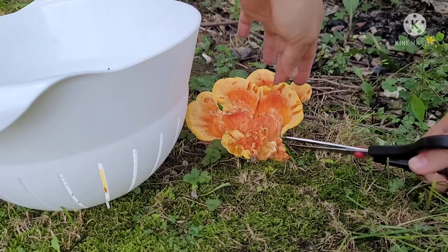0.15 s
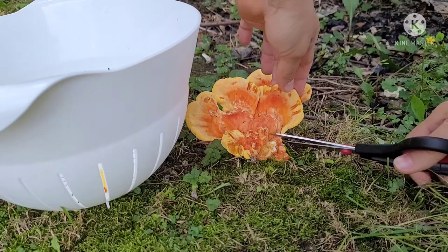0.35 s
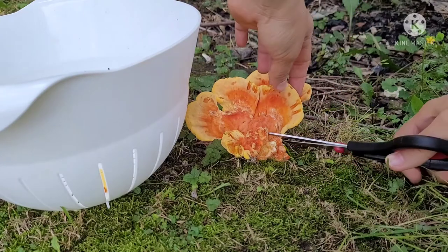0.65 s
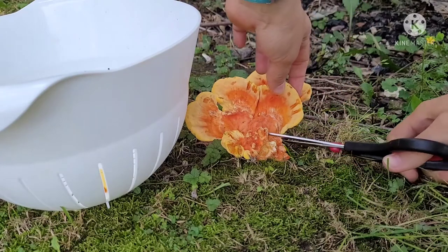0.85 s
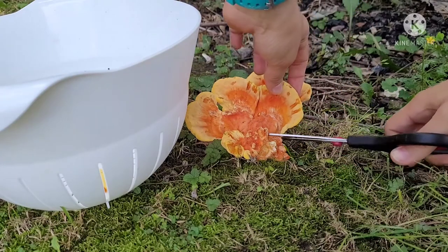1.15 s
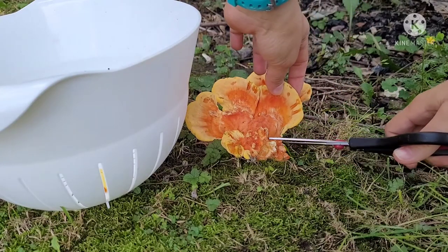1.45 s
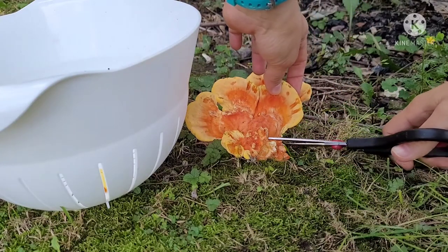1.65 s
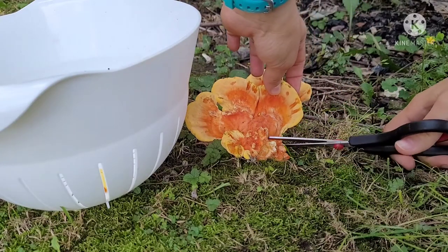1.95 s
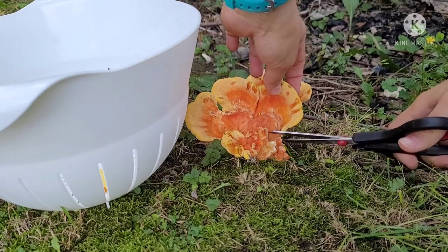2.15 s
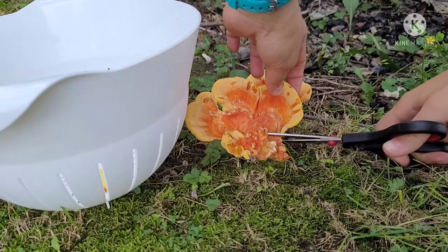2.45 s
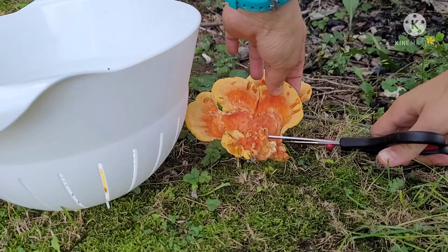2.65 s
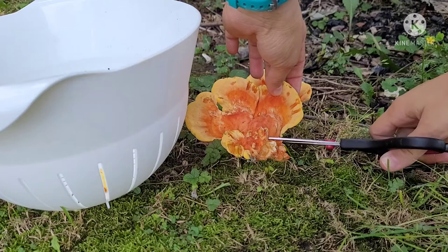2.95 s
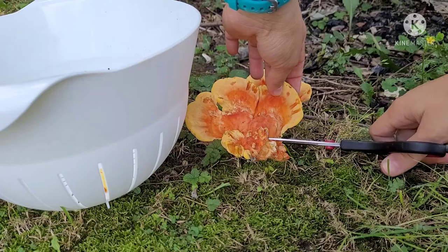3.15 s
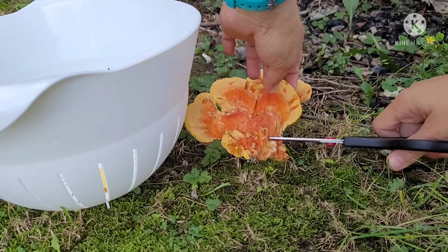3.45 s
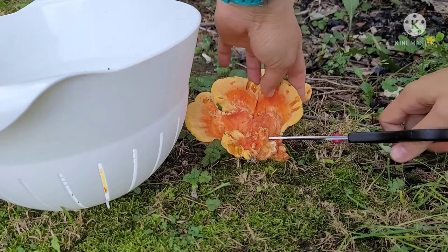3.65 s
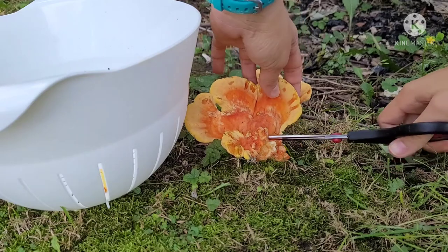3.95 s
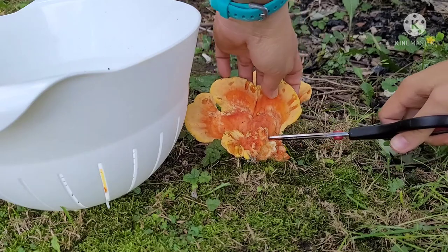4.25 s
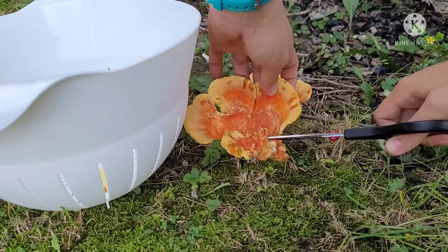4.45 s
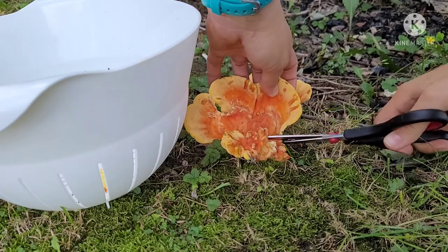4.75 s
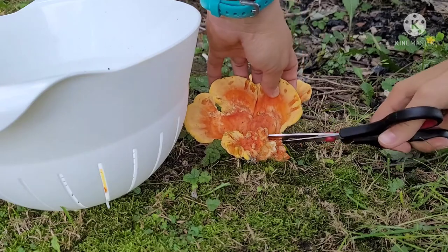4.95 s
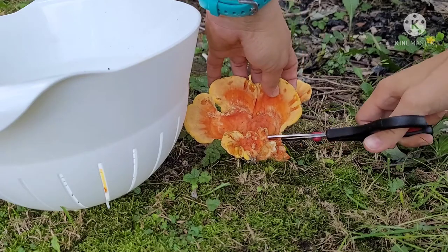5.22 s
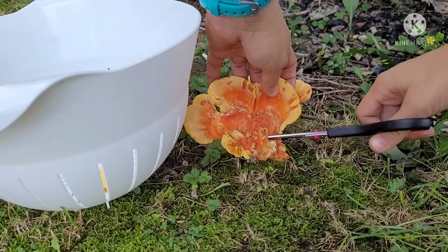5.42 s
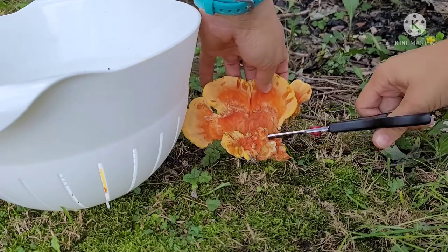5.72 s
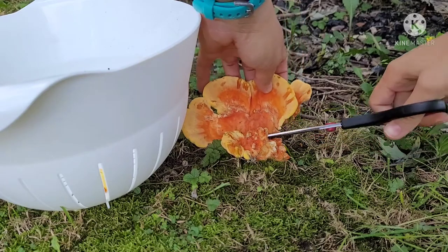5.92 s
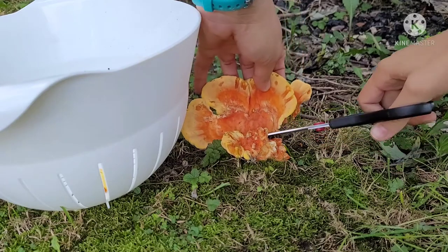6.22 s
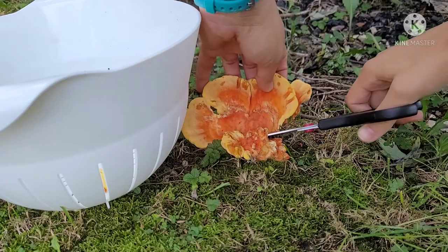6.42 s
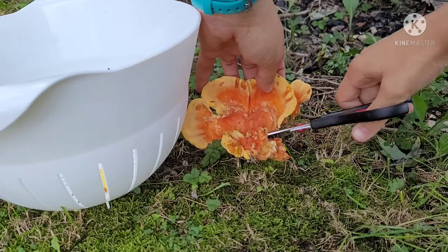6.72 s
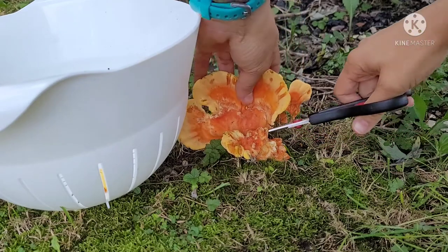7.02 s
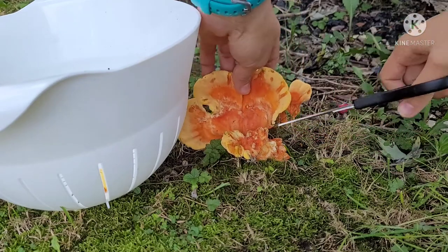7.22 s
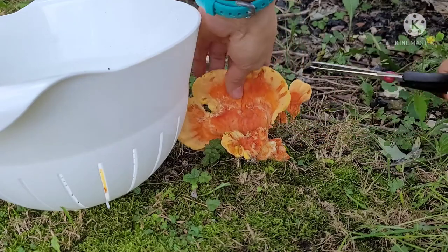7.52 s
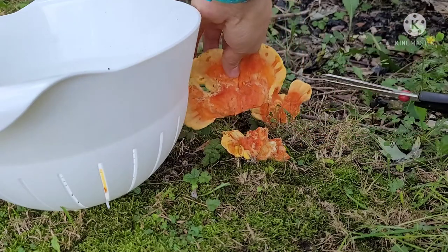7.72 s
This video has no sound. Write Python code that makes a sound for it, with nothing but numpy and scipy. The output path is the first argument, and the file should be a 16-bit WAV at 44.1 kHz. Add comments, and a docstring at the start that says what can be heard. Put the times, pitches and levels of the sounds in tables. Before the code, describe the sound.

Outdoors, a steady high cricket buzz and dull distant drone run throughout. Small dry ticks come first, then scissors nearby: crackling fibres and a hard snap, a gritty rub as the blades open, a long pause, a second snip, then a third. Soft rustling, faint falling bird whistles, a dull knock as the mushroom comes free and a final handle clack follow. The cutting is close and dry, with little echo.

```python
"""Crickets buzz from the start over a low outdoor rumble, with a faint brushing hand close by.
Scissors then cut a mushroom on a mossy woodland floor: three times flesh cracks, blades snap and rub open.
A far bird whistles, something rustles softly, twigs tick.
Contact sounds are noise bursts and slips driving resonances; animals are gliding sines; the air is coloured noise."""
import sys
import numpy as np
from scipy import signal
from scipy.fft import rfft, irfft
from scipy.io import wavfile

SR = 44100
rng = np.random.default_rng(int(sys.argv[2]) if len(sys.argv) > 2 else 0)


def to_wav(s):
    """Save 16-bit WAV."""
    ch = np.atleast_2d(s).T  # columns
    pcm = np.round(np.clip(ch, -1, 1) * 32767)  # PCM
    wavfile.write(sys.argv[1], SR, pcm.astype(np.int16))


N = 347135
TIME_S = np.arange(N) / SR
FREQS_HZ = np.maximum(np.arange(N // 2 + 1) * SR / N, 1)

# Levels in the tables are relative: gains, resonances and echoes follow. Colours are dB per Hz, scaled to rms 1.
# left-right likeness of noise: f/Hz, likeness (-1 to 1)
STEREO_LIKENESS = [(60, 0.9), (130, 0.96), (290, 0.83), (640, 0.026), (1400, -0.14), (3100, -0.1),
                   (15000, -0.045)]

# outdoor noise colours: f/Hz, density/dB
RUMBLE_COLOUR = [(11, -34.5), (18, -37), (43, -6), (59, 1), (86, -4.5), (114, -1), (200, -9.5), (260, -37),
                 (440, -120)]
DRONE_COLOUR = [(170, -17), (205, -5.5), (225, -1), (240, 5.5), (255, -2), (280, 2), (320, -6),
                (400, -11.5), (520, -21.5), (800, -56)]
AIR_COLOUR = [(300, -10), (600, 4), (800, 2.5), (1100, 2.5), (1350, -1.5), (1650, 2), (2050, -3.5),
              (2480, -11), (2800, -9), (3200, -19), (4400, -18.5), (5300, -43), (9000, -50)]
HISS_COLOUR = [(9000, -21.5), (10500, -33.5), (12500, -23), (14200, -2), (15100, 6), (15600, -5.5)]
# rises of the rumble: middle t/s, half length/s, rise/dB
RUMBLE_SWELLS = [(0.615, 0.012, 5.5), (1.463, 0.083, 5), (2.307, 0.079, 5), (2.56, 0.055, 8),
                 (3.9, 0.029, 7.5), (3.99, 0.093, 7), (4.224, 0.063, 5), (4.61, 0.053, 4.5),
                 (5.07, 0.38, 3), (6.164, 0.018, 8.5)]
RUMBLE_DB, RUMBLE_WANDER_DB = -50, -1
# far drone: t/s, level/dB
DRONE_LEVEL = [(0, -52), (2.4, -51), (3.25, -49.5), (3.7, -53.5), (4, -50.5), (5.85, -51.5), (7.05, -50),
               (7.4, -53), (7.87, -52)]
# narrow hum in the drone, swelling once
HUM_AT_S, HUM_HALF_S, HUM_HZ, HUM_WIDTH_HZ, HUM_DB = 3.204, 0.504, 278.6, 22, -49

# soft far rustle: t/s, length before the fade/s, level/dB
RUSTLES = [(5.106, 0.23, -61), (6.697, 0.35, -64)]
# rustle colour: f/Hz, density/dB
RUSTLE_COLOUR = [(300, -12), (550, 2.5), (900, 3), (1400, 1), (1900, 3), (2700, 0.5), (3300, -2),
                 (4300, -5.5), (4900, -14), (6000, -20), (9000, -43)]

# falling bird whistles: t/s, length/s, start f/Hz, end f/Hz, level/dB
WHISTLES = [(6.285, 0.43, 3650, 3270, -69), (6.858, 0.4, 3600, 3270, -72), (7.58, 0.38, 3700, 3160, -70.5)]

# far cricket chorus: f/Hz, density/dB
CHORUS_COLOUR = [(5600, -49), (6300, -20), (6800, -8), (7200, 0.5), (7750, 1.5), (8150, -3), (8700, -16),
                 (9700, -18), (10400, -43)]
# tree-cricket trill: t/s, level/dB
TRILL_LEVEL = [(0, -72.5), (1.2, -79.5), (2, -77.5), (3, -80), (4.2, -78), (5, -82), (6.3, -76),
               (7.87, -73.5)]
TRILL_HZ = 2790
# two-note chirps: first note t/s, level/dB
CRICKET_CHIRPS = [(.2, -70), (.83, -77), (1.41, -76), (2.1, -75), (5.3, -75), (6.49, -79), (7.56, -77)]
CHIRP_NOTE_HALF_S, CHIRP_NOTE_SPACING_S = 0.017, 0.056
# near cricket: t/s, level/dB
CRICKET_LEVEL = [(0, -56.5), (2.2, -53.5), (2.9, -55.5), (3.9, -53.5), (5.3, -57), (7.87, -55)]
# its strokes in a wing beat: place (0-1), half width/beats, f/Hz, fall/(Hz per beat), level/dB, L-R/dB
WING_STROKES = [(0.18, 0.18, 7875, 220, 3.5, 5.5), (.55, 0.19, 7440, 110, 1.5, 0.5),
                (0.06, 0.17, 8520, 350, -19.5, 1)]
BUZZ_WING_HZ = 47.2

# dry twigs ticking: t/s, level/dB, pitch ratio (limited to 0.7-1.3)
TWIG_TICKS = [(1.4794, -40, 1.15), (1.8771, -39, 1), (2.0482, -37, 1.4), (4.1345, -38, 1.1),
              (4.7925, -35, 0.87), (4.8194, -37, 1)]
# twig resonances: f/Hz, width/Hz, level/dB, L-R/dB
TWIG_MODES = [(3270, 570, -1, 5), (5350, 2300, 1, 0), (12000, 4000, -14, 2)]

# hand shifting on mushroom and moss: middle t/s, half length/s, level/dB
BRUSHES = [(0.098, 0.24, -75), (.65, 0.25, -88), (1.113, 0.15, -76), (4.26, 0.12, -81),
           (6.638, 0.094, -71.5), (7.143, 0.062, -71.5), (7.55, 0.15, -81)]
# brushing colour: f/Hz, density/dB
BRUSH_COLOUR = [(2500, 1), (4500, 0), (8000, 6.5), (10500, 1), (13000, 4.5), (15200, 1)]
HOLD_DB = -84.5  # hand at rest, relative as in BRUSHES

# loose handles clacking: t/s, level/dB, pitch ratio
CLACKS = [(1.724, -22, 1.13), (7.6503, -11, 0.93)]
# handle resonances: f/Hz, width/Hz, level/dB, L-R/dB
HANDLE_MODES = [(330, 100, 4.5, -6), (654, 330, 0.5, 6), (990, 170, 4, -2), (1550, 160, -5.5, 4),
                (1890, 250, -14.5, 3), (2600, 540, -21, 3), (3800, 170, -19, 21)]
# dull knock as the mushroom comes free: t/s, f/Hz, width/Hz, level/dB
KNOCKS = [(7.265, 595, 178, -10.5)]

# snips: shut t/s, snap/dB, L-R/dB, squeeze lead/s, squeeze/dB, pressure half length/s, ring pitch ratio
SNIPS = [(3.5106, 1.5, -2, .087, -54, 0.046, 1.06), (5.7599, 0, -1.5, 0.16, -54, 0.12, 0.98),
         (6.9552, 0, 1, 0.034, -59, 0.08, 0.98)]
SQUEEZE_HALF_S, SQUEEZE_TREBLE_DB = 0.013, -3.5
SETTLE_DECAY_S, SETTLE_DB, SETTLE_TREBLE_DB = 0.04, -58, 9.5
PRESS_DB, PRESS_LEAD = -61.5, 0.23  # pressure peaks this share of its half length before the squeeze
# crunches of the opening blades: t/s, fall time/s, level/dB, hiss above level/dB
CRUNCHES = [(3.6234, 0.0094, -39.5, -1), (3.654, 0.012, -45.5, -15), (5.961, 0.035, -53, 7.5),
            (6, .014, -54.5, 7.5), (7.119, 0.017, -53.5, 10.5)]
CRUNCH_SHARP_DB, CRUNCH_RUB_DB = -2.5, -6  # slips into upper modes; hiss into lower modes
# cracks in the flesh: t/s, level/dB, treble/dB, crumbling decay/s
CRACKS = [(3.305, -27, -14.5, 0.0018), (3.336, -29, -5, 0.0058), (3.381, -25, -4, 0.0048),
          (3.427, -9.5, -14, 0.0044), (3.4335, -6.5, 3, 0.0024), (3.482, -20.5, -8, 0.0024),
          (3.5085, -11, 1, 0.0015), (5.513, -20.5, -3, 0.005), (5.578, -7.5, 0.5, 0.0026),
          (5.58, -11.5, -5, .001), (5.591, -22, 4, 0.0035), (5.602, -18, -2.5, 0.006),
          (5.607, -7, 1, 0.0015), (5.693, -25, -26, 0.0016), (6.911, -25, -1, .0025),
          (6.944, -14.5, -4, 0.0031), (6.9603, -15.5, -10, 0.0017)]
# resonances of blades buried in flesh, sliding blades, snapping scissors: f/Hz, width/Hz, level/dB, L-R/dB
FLESH_MODES = [(386, 170, 7, -3), (537, 92, 0, 6), (1074, 215, 10, -1), (1230, 140, 3.5, 11),
               (1720, 160, -17, -8), (2100, 210, -0.5, 12), (2820, 150, 0, -15), (4500, 590, -10, -10),
               (7800, 2000, -8.5, -14), (10000, 2200, -3, 9.5), (14000, 1600, -30, 0.5)]
BLADE_MODES = [(1105, 1200, -5, -4), (1460, 200, -2, 3), (1870, 280, 5.5, -1.5), (2800, 290, 10, 2),
               (4500, 1500, -9, 4), (6240, 550, -8, -6), (9000, 9000, -9.5, 1), (13500, 5000, -18, -6)]
SCISSOR_MODES = [(406, 230, 0.5, 1.5), (910, 82, 3.5, 2), (1180, 220, -1.5, -2), (1730, 120, 2, 2),
                 (2310, 440, 4.5, 7.5), (3060, 260, 0.5, -7), (4070, 1200, 1.5, 5), (6570, 730, 9, -10.5),
                 (7900, 700, 10, -6.5), (10300, 1150, 14, 8), (11730, 970, 14.5, 3.5), (13700, 2200, 2, 10)]
LEFT_LAG_S = 6 / SR  # scissors lie a little to the right
CUTOFF_HZ = 15750


def from_db(db):
    """Decibels to gain."""
    return 10 ** (np.asarray(db) / 20)


def rms_one(x):
    """Scale to rms 1."""
    return x / np.sqrt(np.mean(x ** 2) + 1e-20)


def panned(pan_db):
    """Left and right gains for a level difference."""
    return from_db(np.array([[pan_db], [-pan_db]]) / 2)


def over_time(points):
    """A level curve at every sample."""
    s, level_db = np.transpose(points)
    return np.interp(TIME_S, s, level_db)


def over_hz(points):
    """A spectrum joined on a log-frequency axis."""
    hz, values = np.transpose(points)
    return np.interp(np.log(FREQS_HZ), np.log(hz), values)


def swell(s, half_s):
    """Bell-shaped rise and fall about a moment."""
    return np.exp(-np.minimum(((TIME_S - s) / half_s) ** 2, 50))


def dying(s, decay_s):
    """Starts at a moment and fades evenly in dB."""
    return (TIME_S >= s) * np.exp(-np.clip((TIME_S - s) / decay_s, 0, 50))


def drift(rate_hz):
    """Random wander below a rate, rms 1."""
    spectrum = rfft(rng.standard_normal(N))
    return rms_one(irfft(spectrum / (1 + (FREQS_HZ / rate_hz) ** 4), N))


def coloured(spectrum):
    """Stereo noise of a given colour, alike in the bass and nearly unrelated in the treble; rms 1."""
    mid, side = rfft(rng.standard_normal((2, N)))
    alike = np.clip(over_hz(STEREO_LIKENESS), -1, 1)
    both = np.sqrt(1 + alike) * mid + np.sqrt(1 - alike) * side * [[1], [-1]]
    return rms_one(irfft(both * from_db(over_hz(spectrum)), N))


def tone(hz):
    """A sine that follows a pitch curve."""
    return np.sin(2 * np.pi * np.cumsum(hz) / SR)


def burst(decay_s, size=2048):
    """Dying cluster of tiny contacts with unit energy on each side."""
    grains = rng.standard_normal((2, size)) * np.exp(-np.arange(size) / SR / decay_s)
    return grains / np.sqrt(np.sum(grains ** 2, axis=1, keepdims=True))


def grit(per_s, spread_db):
    """Tiny slips at random moments, of random strength and sign; rms 1."""
    strength_db = spread_db * np.minimum(rng.exponential(1, N), 3)
    sizes = from_db(strength_db) * rng.choice([-1, 1], N)
    return rms_one((rng.random(N) < per_s / SR) * sizes)


def resonate(x, hz, width_hz):
    """One resonance with gain near 1 on top."""
    r = np.exp(-np.pi * width_hz / SR)
    zeros = np.array([1, 0, -1]) * (1 - r * r) / 2
    poles = [1, -2 * r * np.cos(2 * np.pi * hz / SR), r * r]
    return signal.lfilter(zeros, poles, x + 1e-18)


def body(force, sharp_force, modes):
    """Parallel resonances: upper ones answer to the sharp force, lower ones to the dulled force."""
    upper_hz = 4000
    lowpass = signal.butter(2, upper_hz, fs=SR, output="sos")
    dull = signal.sosfilt(lowpass, force + 1e-18)
    out = 0
    for hz, width_hz, db, pan_db in modes:
        drive = sharp_force if hz > upper_hz else dull
        out = out + from_db(db) * panned(pan_db) * resonate(drive, hz, width_hz)
    return out


def retuned(modes, ratio):
    """The same resonances, shifted by the grip and the point of contact."""
    return [(hz * np.clip(ratio, .7, 1.3), *rest) for hz, *rest in modes]


def add(track, s, sound):
    """Mix a short sound in at a time."""
    at = int(round(s * SR))
    track[:, at:at + sound.shape[-1]] += sound


def taps(rows, modes, rattle_db, rattle_s):
    """A light object taps once and rattles for an instant."""
    out = np.zeros((2, N))
    for s, db, ratio in rows:
        tap = from_db(rattle_db) * burst(rattle_s)
        tap[:, 0] += 1
        add(out, s, from_db(db) * body(tap, tap, retuned(modes, ratio)))
    return out


def scatter(x, near_db, near_s, far_db, far_s):
    """Ground answers at once, trees with a longer tail: two dying noise bursts as echo."""
    near = from_db(near_db) * burst(near_s, size=16384)
    far = from_db(far_db) * burst(far_s, size=16384)
    return x + signal.fftconvolve(x, near + far, axes=1)[:, :N]


def outdoors(drone_trim_db, air_db, hiss_db):
    """Swelling low rumble, far drone, soft wash of open air and fine high hiss, all coloured noise."""
    swells_db = sum(db * swell(s, half_s) for s, half_s, db in RUMBLE_SWELLS)
    rumble_db = RUMBLE_DB + RUMBLE_WANDER_DB * drift(7.9) + swells_db
    rumble = from_db(rumble_db) * coloured(RUMBLE_COLOUR)
    drone = from_db(over_time(DRONE_LEVEL) + drone_trim_db) * coloured(DRONE_COLOUR)
    air = from_db(air_db) * coloured(AIR_COLOUR)
    return rumble + drone + air + from_db(hiss_db) * coloured(HISS_COLOUR)


def hum():
    """A narrow band of the far drone rises and sinks: noise through two equal resonances."""
    band = resonate(rng.standard_normal(N), HUM_HZ, HUM_WIDTH_HZ)
    band = resonate(band, HUM_HZ, HUM_WIDTH_HZ)
    return from_db(HUM_DB) * swell(HUM_AT_S, HUM_HALF_S) * rms_one(band)


def rustles(rise_s, fall_s, uneven_db):
    """Each rustle swells, holds and sinks away, too far off for single grains to be heard."""
    level = 0
    for s, length_s, db in RUSTLES:
        rise = (1 - swell(s, rise_s)) * (TIME_S >= s)
        hold = TIME_S < s + length_s
        level = level + from_db(db) * rise * (hold + dying(s + length_s, fall_s))
    return level * from_db(uneven_db * drift(15)) * coloured(RUSTLE_COLOUR)


def bird(waver_hz, flutter_db):
    """Each whistle swells quickly, slides down and fades, broken up by strong echoes from the trees."""
    out = np.zeros(N)
    for s, length_s, start_hz, end_hz, db in WHISTLES:
        age = np.clip((TIME_S - s) / length_s, 0, 1)
        hz = end_hz + (start_hz - end_hz) * (1 - age) ** 1.5
        level = from_db(db + flutter_db * drift(25)) * np.sin(np.pi * age ** .7) ** 2
        out += level * tone(hz + waver_hz * drift(150))
    return scatter(np.array([out, out]), near_db=-1, near_s=.02, far_db=0, far_s=.09)


def far_crickets(chorus_db, trill_db, trill_flutter_db, chirp_db, chirp_hz):
    """High noise chorus, wavering tree-cricket tone and two-note chirps echoing in the undergrowth."""
    chorus = from_db(chorus_db) * coloured(CHORUS_COLOUR) * panned(pan_db=-1.5)
    trill_level = from_db(trill_db + over_time(TRILL_LEVEL) + trill_flutter_db * drift(14))
    trill = trill_level * tone(TRILL_HZ + 22 * drift(61.6))
    notes = 0
    for s, db in CRICKET_CHIRPS:
        pair = swell(s, CHIRP_NOTE_HALF_S) + swell(s + CHIRP_NOTE_SPACING_S, CHIRP_NOTE_HALF_S)
        notes = notes + from_db(db + chirp_db) * pair
    chirps = notes * tone(chirp_hz + 70 * drift(214))
    chirps = scatter(chirps * panned(pan_db=-1), near_db=-2, near_s=0.008, far_db=-3, far_s=0.04)
    return chorus + trill * panned(pan_db=-6.5) + chirps


def near_cricket(level_db, wander_beats, jitter_hz, uneven_db):
    """Each wing stroke drags the file over the scraper: a short, rough, slightly falling tone."""
    beats = BUZZ_WING_HZ * TIME_S + wander_beats * drift(2)
    song = 0
    for place, half_width, hz, fall_hz, db, pan_db in WING_STROKES:
        progress = (beats - place + .5) % 1 - .5
        pitch = hz - fall_hz * progress + jitter_hz * drift(244.6)
        pressure = from_db(db + uneven_db * drift(80)) * np.exp(-(progress / half_width) ** 2)
        song = song + panned(pan_db) * pressure * tone(pitch)
    song = scatter(song, near_db=0.0, near_s=0.0051, far_db=0.5, far_s=0.019)
    return from_db(over_time(CRICKET_LEVEL) + level_db) * rms_one(song)


def twig_ticks():
    """Dry twigs in the litter tick: short taps ringing broad high resonances."""
    return taps(TWIG_TICKS, TWIG_MODES, rattle_db=-0.5, rattle_s=0.0064)


def brushing(level_db, uneven_db):
    """Skin on mushroom and moss: faint uneven hiss, swelling with each shift of the grip."""
    motion = from_db(HOLD_DB) + sum(from_db(db) * swell(s, half_s) for s, half_s, db in BRUSHES)
    return motion * from_db(level_db + uneven_db * drift(22.7)) * coloured(BRUSH_COLOUR)


def handle_clacks():
    """Loose handles clack: taps ringing the handle resonances."""
    return taps(CLACKS, HANDLE_MODES, rattle_db=2, rattle_s=0.002)


def knocks():
    """Soft flesh and moss damp each knock within a few cycles."""
    out = np.zeros(N)
    for s, hz, width_hz, db in KNOCKS:
        out += from_db(db) * resonate(signal.unit_impulse(N, round(s * SR)), hz, width_hz)
    return out


def crunches(slips_per_s, spread_db, hiss_db, hiss_rise_s, hiss_decay_s):
    """Opening blades stick and slip: each crunch starts at once, inside a steel hiss that trails off."""
    force, hiss = np.zeros((2, N))
    for s, length_s, db, treble_db in CRUNCHES:
        force += from_db(db) * (TIME_S >= s) * swell(s, length_s)
        envelope = (TIME_S < s) * swell(s, hiss_rise_s) + dying(s, hiss_decay_s)
        hiss += from_db(db + treble_db) * envelope
    force = force * grit(slips_per_s, spread_db)
    hiss = from_db(hiss_db) * hiss * rng.standard_normal((2, N))
    dull = force + from_db(CRUNCH_RUB_DB) * hiss
    sharp = from_db(CRUNCH_SHARP_DB) * force + hiss
    return body(dull, sharp, BLADE_MODES)


def pressing(fibres_per_s, spread_db, treble_db, steel_db):
    """Around each shearing stroke the edges bear down; fibres part, crackling in flesh and blades."""
    pressure = 0
    for s, _, _, lead_s, _, press_s, _ in SNIPS:
        pressure = pressure + swell(s - lead_s - PRESS_LEAD * press_s, press_s)
    force = from_db(PRESS_DB) * pressure * grit(fibres_per_s, spread_db)
    sharp = from_db(treble_db) * force
    return body(force, sharp, FLESH_MODES) + from_db(steel_db) * body(force, sharp, BLADE_MODES)


def blade_strokes():
    """Every snip shears, then grinds to rest: pairs of (pressure over time, treble/dB)."""
    for s, _, _, lead_s, squeeze_db, _, _ in SNIPS:
        yield from_db(squeeze_db) * swell(s - lead_s, SQUEEZE_HALF_S), SQUEEZE_TREBLE_DB
        yield from_db(SETTLE_DB) * dying(s, SETTLE_DECAY_S), SETTLE_TREBLE_DB


def rubs(slips_per_s, hiss_db, level_db):
    """Blade friction: a dense run of tiny slips with a fine hiss."""
    hiss = from_db(hiss_db) * rng.standard_normal((2, N))
    friction = rms_one(grit(slips_per_s, spread_db=8) + hiss)
    strokes = list(blade_strokes())
    force = sum(stroke for stroke, treble_db in strokes)
    sharp = sum(stroke * from_db(treble_db) for stroke, treble_db in strokes)
    return from_db(level_db) * body(force * friction, sharp * friction, BLADE_MODES)


def cracks(tick_db, crumble_db):
    """Each bundle of fibres parts with a tick and crumbles for a few milliseconds."""
    force, sharp = np.zeros((2, 2, N))
    for s, db, treble_db, crumble_s in CRACKS:
        crack = from_db(crumble_db) * burst(crumble_s)
        crack[:, 0] += from_db(tick_db)
        add(force, s, from_db(db) * crack)
        add(sharp, s, from_db(db + treble_db) * crack)
    return body(force, sharp, FLESH_MODES)


def snaps(bounce_db, bounce_s, chatter_db, chatter_s, slide_db, slide_s):
    """Flesh gives way: the edges race over each other, hit the stop, bounce once and chatter briefly."""
    out = np.zeros((2, N))
    for s, db, pan_db, _, _, _, ratio in SNIPS:
        slide = from_db(slide_db) * burst(slide_s, size=170)[0, ::-1]  # reversed: grows towards the stop
        stop = from_db(chatter_db) * burst(chatter_s)[0]
        stop[0] += 1
        stop[int(bounce_s * SR)] += from_db(bounce_db)
        force = np.concatenate([slide, stop])
        modes = retuned(SCISSOR_MODES, ratio)
        # neighbouring resonances swing in opposite directions
        ring = body(force, force, modes[::2]) - body(force, force, modes[1::2])
        add(out, s - len(slide) / SR, from_db(db) * panned(pan_db) * ring)
    return out


def scene():
    """Scissors close by, with insects, bird and rumble around them."""
    around = outdoors(drone_trim_db=0.0, air_db=-66, hiss_db=-78.5) + hum()
    around = around + rustles(rise_s=0.053, fall_s=0.3, uneven_db=1.5)
    around = around + bird(waver_hz=34, flutter_db=3)
    insects = far_crickets(chorus_db=-60.0, trill_db=-3.5, trill_flutter_db=2.5, chirp_db=1.0, chirp_hz=4370)
    insects = insects + near_cricket(level_db=-2.5, wander_beats=0.062, jitter_hz=45.7, uneven_db=1.17)
    hand = brushing(level_db=6.0, uneven_db=3.5)

    close = twig_ticks() + handle_clacks() + knocks()
    close = close + crunches(slips_per_s=1300, spread_db=-4, hiss_db=-5, hiss_rise_s=0.01, hiss_decay_s=0.027)
    close = close + pressing(fibres_per_s=980, spread_db=-0.5, treble_db=-2, steel_db=-0.5)
    close = close + rubs(slips_per_s=1600, hiss_db=3, level_db=7.0)
    close = close + cracks(tick_db=-2.5, crumble_db=-3.5)
    close = close + snaps(bounce_db=-11.5, bounce_s=0.000667, chatter_db=-13.5, chatter_s=0.0031,
                          slide_db=-18, slide_s=0.0031)
    late_left = np.interp(TIME_S - LEFT_LAG_S, TIME_S, close[0])
    close = np.array([late_left, close[1]])
    close = scatter(close, near_db=-8.5, near_s=0.0028, far_db=-31.5, far_s=0.05)
    return around + insects + hand + close


def record(dry):
    """Round the highest peaks and cut the top steeply."""
    top = .85
    rounded = top * np.tanh(dry / top)
    return irfft(rfft(rounded) / np.sqrt(1 + (FREQS_HZ / CUTOFF_HZ) ** 160), N)


dry = scene()
out = record(dry)
to_wav(out)
```